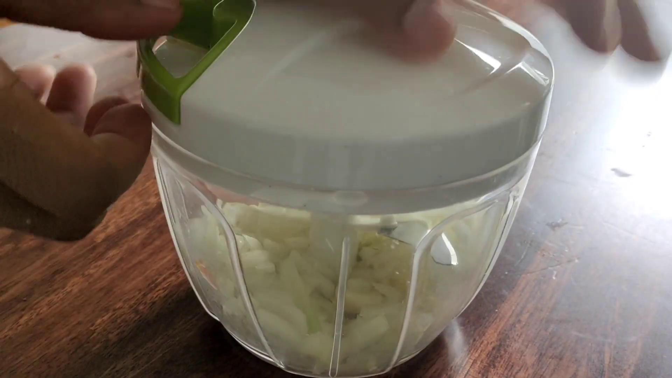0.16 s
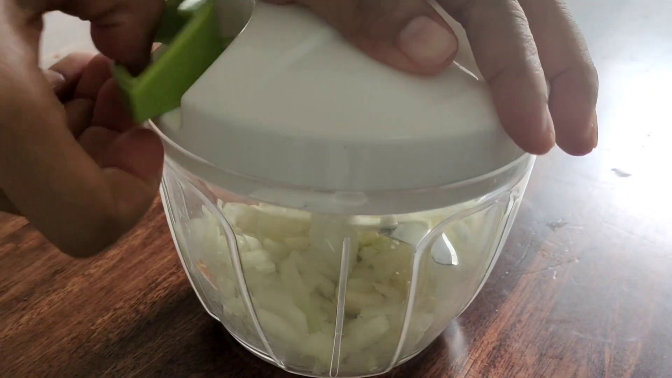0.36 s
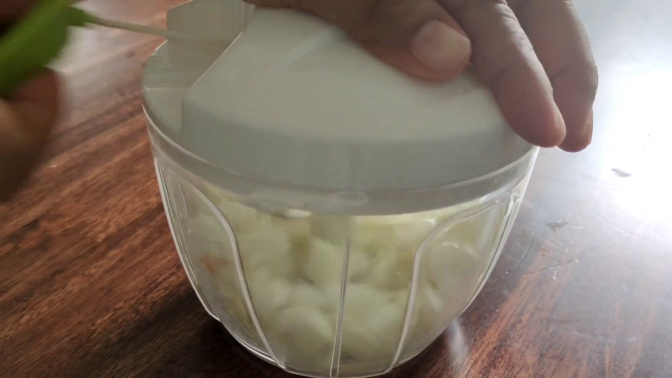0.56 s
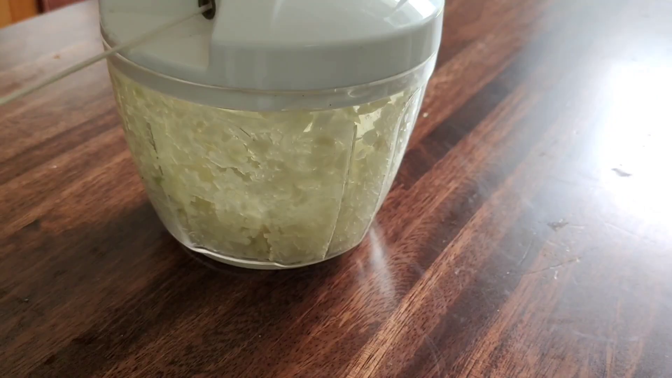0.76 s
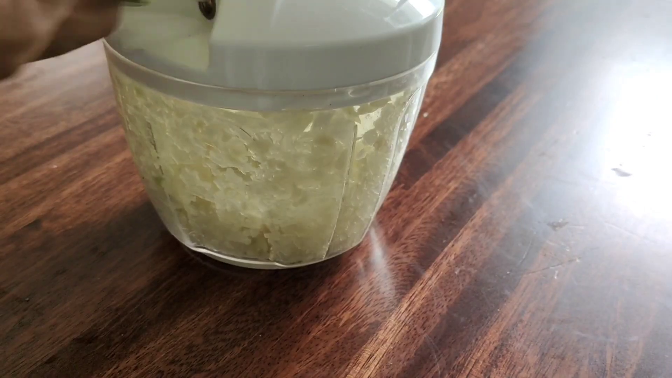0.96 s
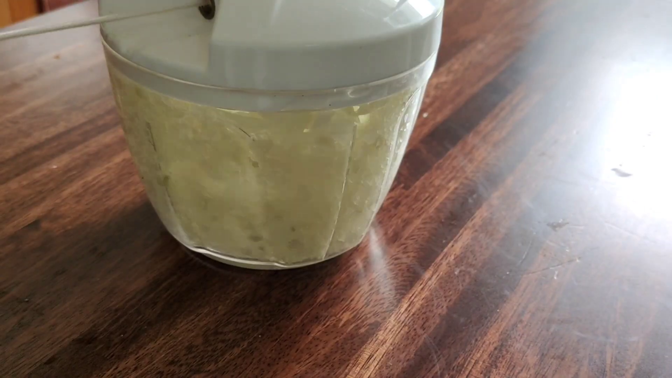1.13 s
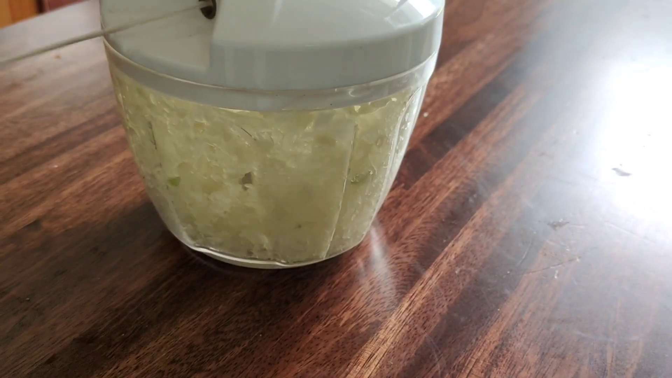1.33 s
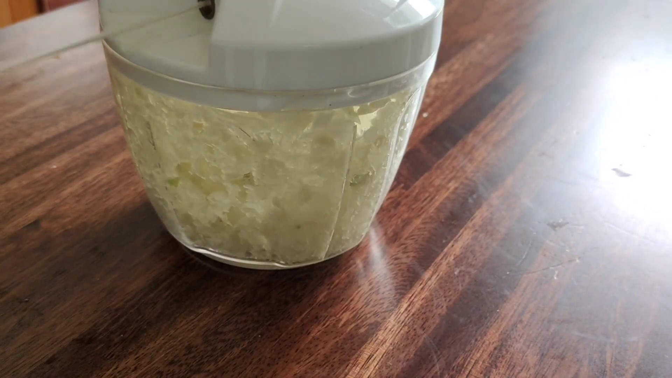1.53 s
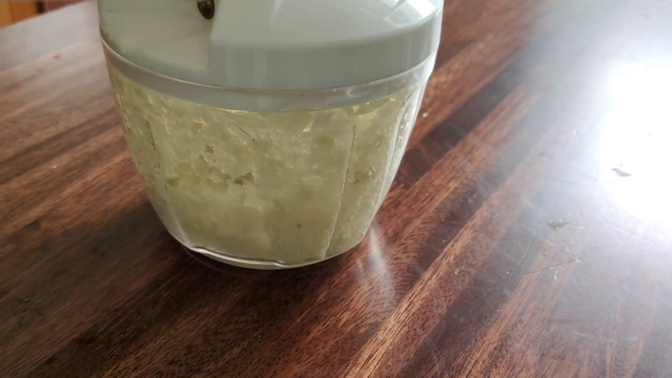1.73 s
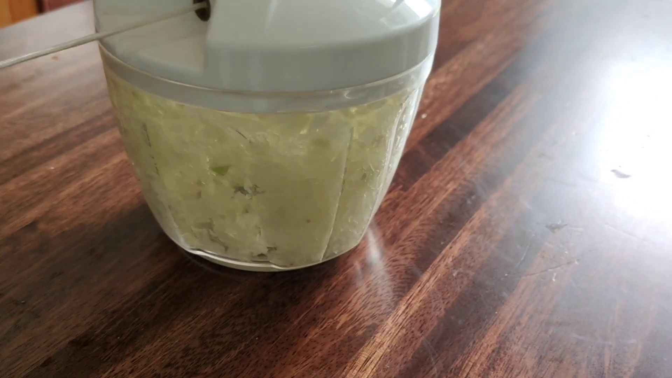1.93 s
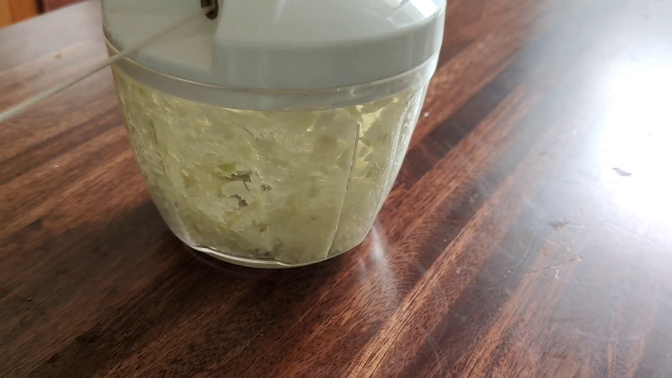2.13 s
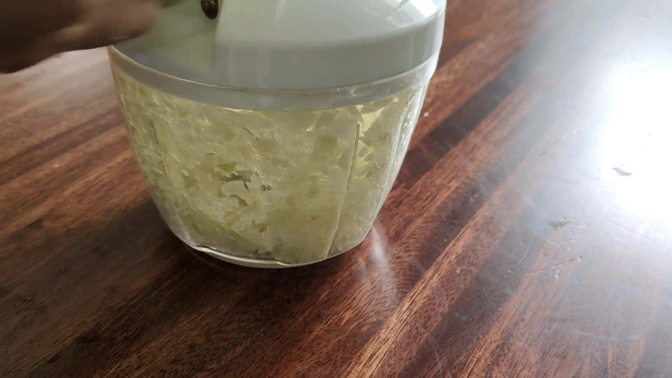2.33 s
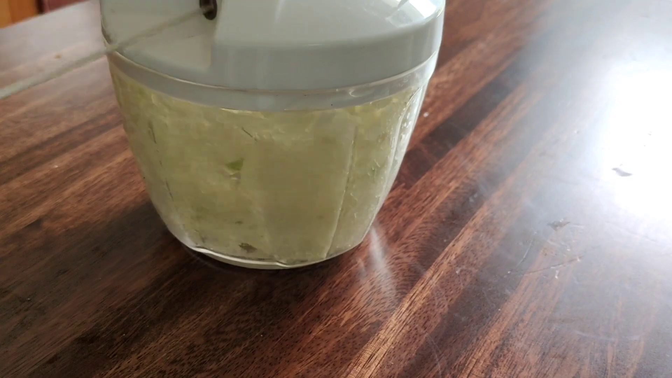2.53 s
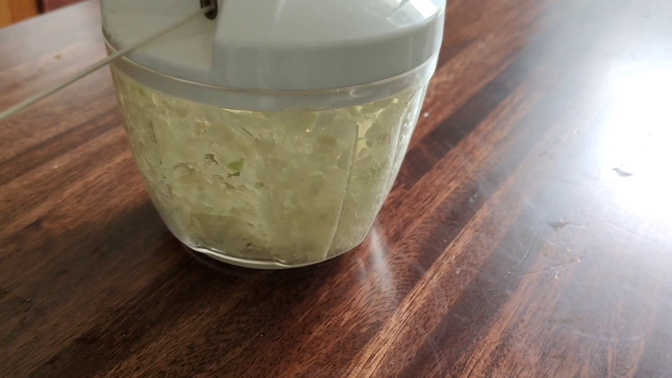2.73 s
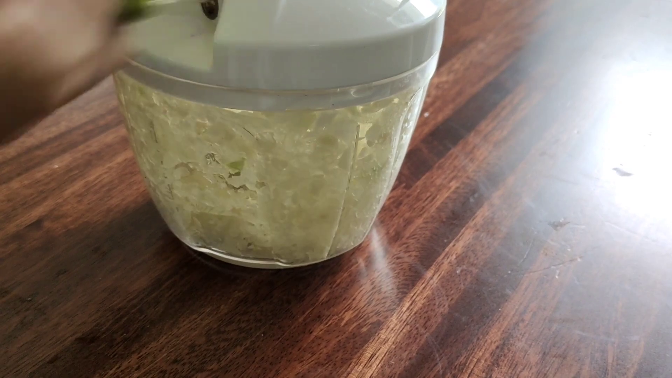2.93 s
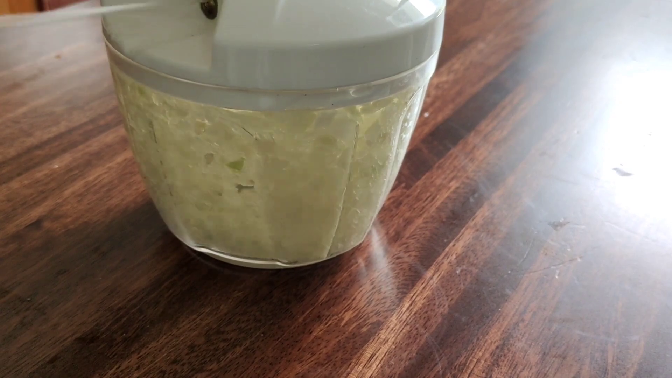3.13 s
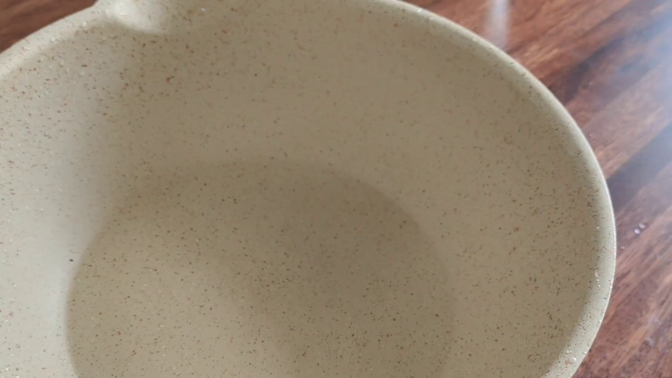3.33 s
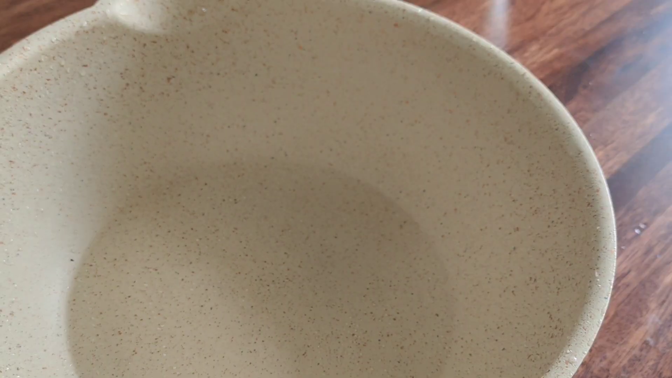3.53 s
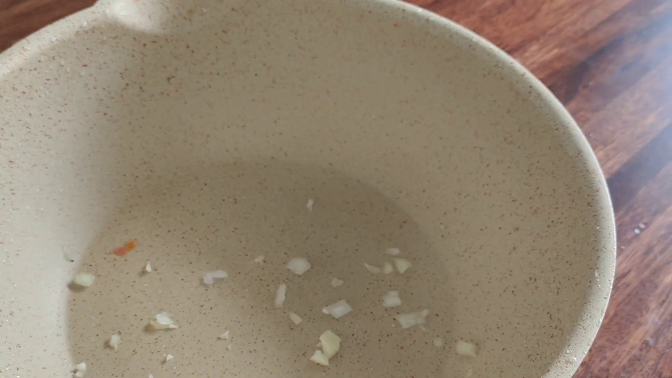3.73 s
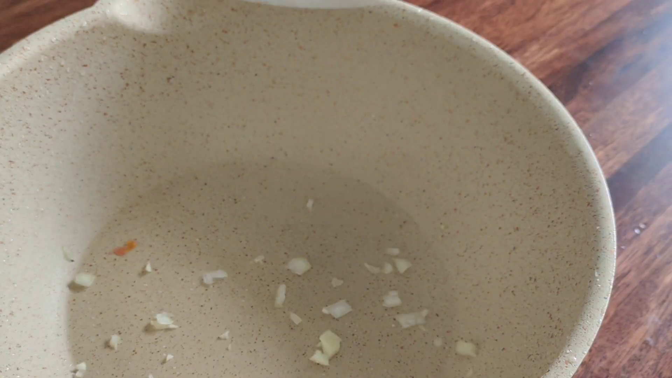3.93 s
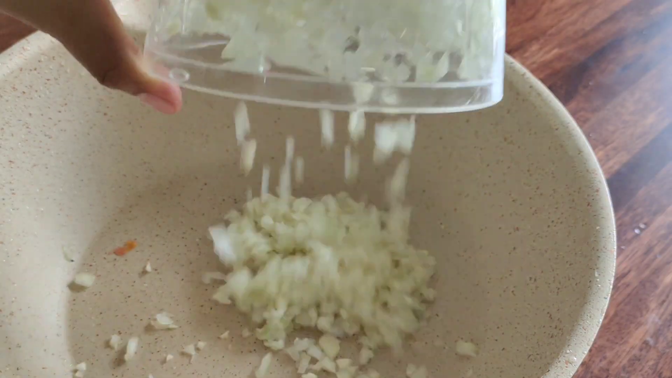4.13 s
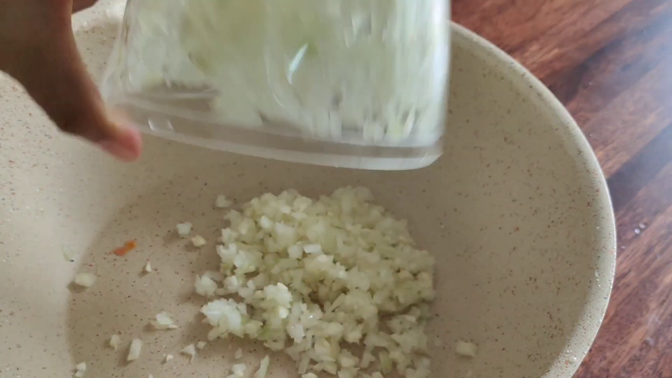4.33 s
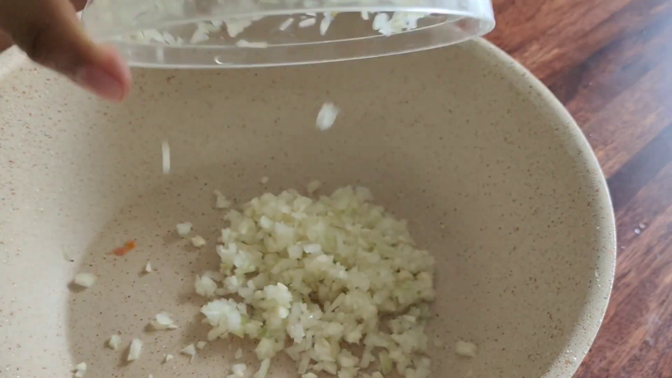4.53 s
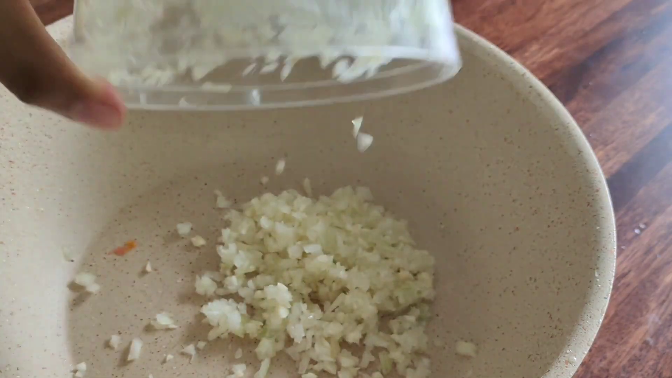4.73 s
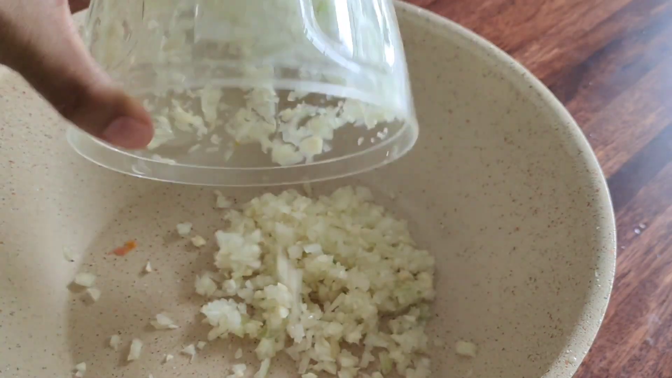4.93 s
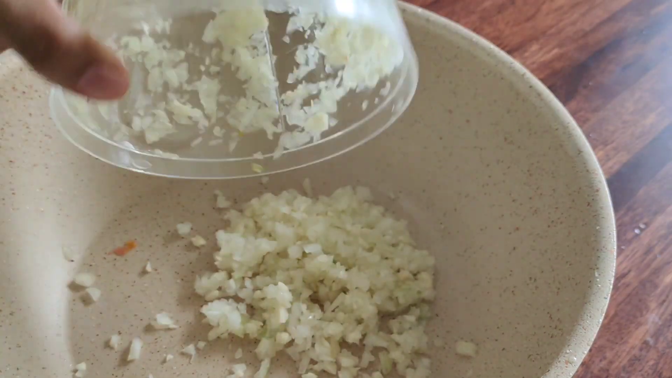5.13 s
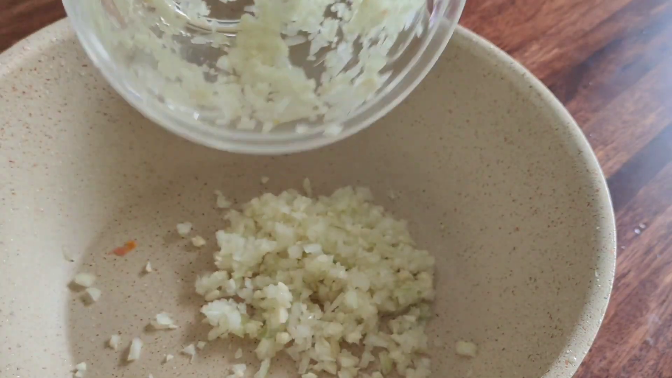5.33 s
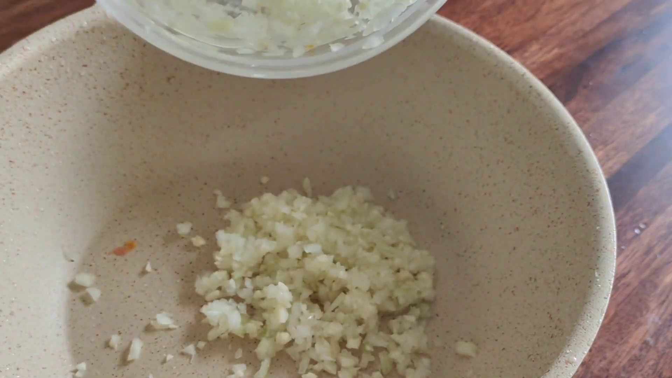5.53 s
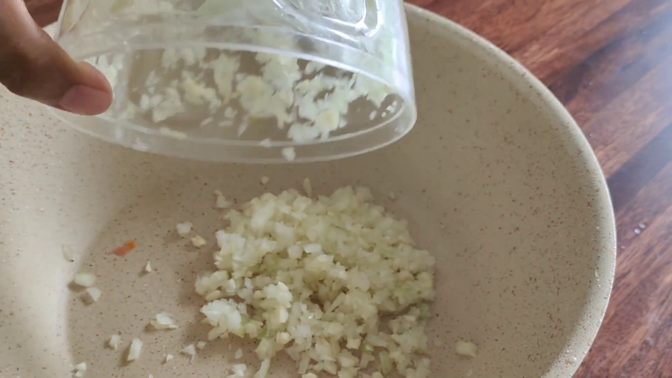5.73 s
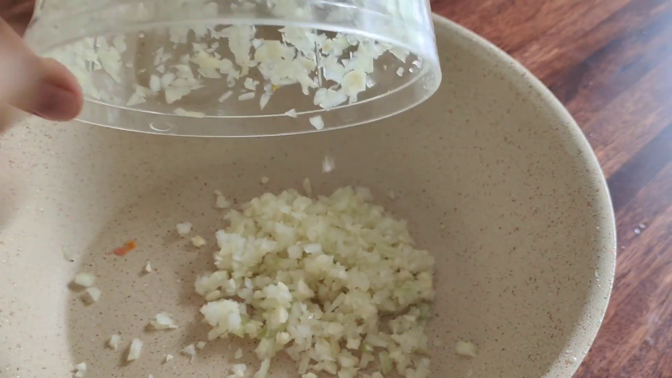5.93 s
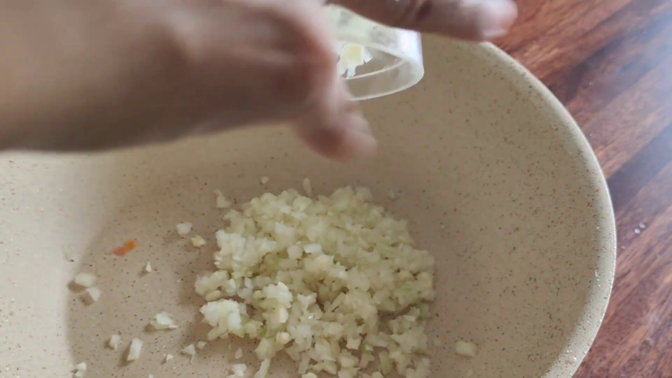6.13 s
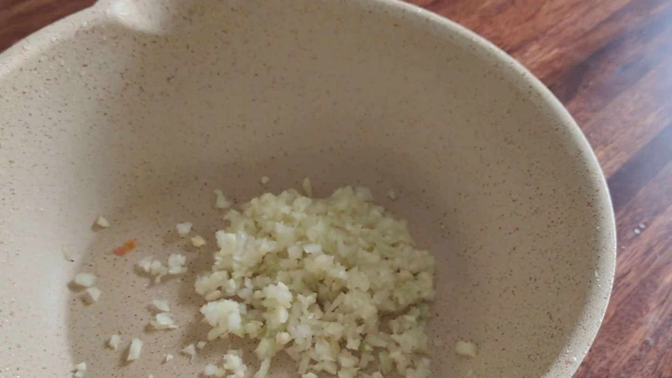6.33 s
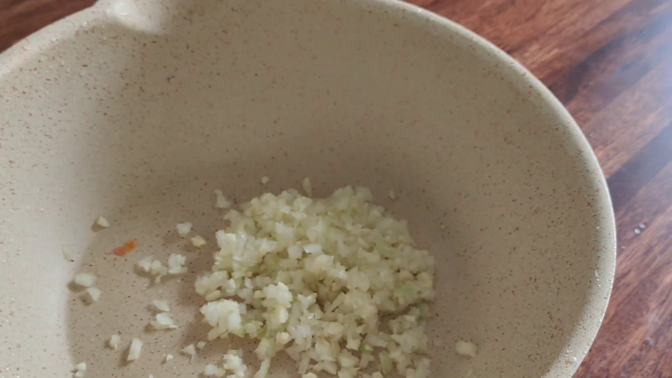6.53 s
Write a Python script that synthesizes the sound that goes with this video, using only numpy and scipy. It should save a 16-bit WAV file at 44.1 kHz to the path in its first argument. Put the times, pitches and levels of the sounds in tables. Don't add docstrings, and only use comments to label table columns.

```python
import sys
import numpy as np
from scipy import signal
from scipy.fft import rfft, irfft, next_fast_len
from scipy.io import wavfile

SR = 44100
rng = np.random.default_rng(int(sys.argv[2]) if len(sys.argv) > 2 else 0)


def int16_out(signal):
    q = np.round(np.clip(np.atleast_2d(signal).T, -1, 1) * 32767)
    wavfile.write(sys.argv[1], SR, q.astype(np.int16))


def how_loud(loudness_db):
    steps = np.asarray(loudness_db, float) / 20
    return 10 ** steps


N = 294588


def rms_one(x):
    return x / np.sqrt(np.mean(x ** 2) + 1e-20)


def at_hz(points, hz, column=1):
    points = np.array(points)
    return np.interp(np.log(hz), np.log(points[:, 0]), points[:, column])


def drift(rate):
    r = np.exp(-80 * np.pi * rate / SR)
    noise = rng.standard_normal(N // 40 + 2002)
    slow = signal.lfilter([1], [1, -2 * r, r * r], noise)[2000:]
    return np.interp(np.arange(N) / 40, np.arange(len(slow)), rms_one(slow))


def resonate(x, hz, width_hz):
    r = np.exp(-np.pi * width_hz / SR)
    poles = [1, -2 * r * np.cos(2 * np.pi * hz / SR), r * r]
    return signal.lfilter(np.array([1, 0, -1]) * (1 - r * r) / 2, poles, x)


def mode_rings(x, modes):
    return [how_loud(db) * resonate(x, hz, width) * (-1) ** k for k, (hz, width, db) in enumerate(modes)]


def band(x, low_hz, high_hz):
    edges = [low_hz, min(high_hz, .45 * SR)]
    return signal.sosfilt(signal.butter(2, edges, "band", fs=SR, output="sos"), x)


def clicks(per_s, spread_db, clump_db, clump_rate):
    sizes = how_loud(spread_db * np.minimum(rng.exponential(1, N), 4)) * rng.choice([-1, 1], N)
    hits = rng.random(N) < per_s / SR
    return how_loud(clump_db * drift(clump_rate)) * sizes * hits + 1e-18


def scatter(spectrum, per_s, burst_ms, alike, spread_db, clump_db):
    contacts = abs(clicks(per_s, spread_db, clump_db, clump_rate=40.0))
    bursts = signal.lfilter([1], [1, -np.exp(-1000 / (burst_ms * SR))], contacts)
    shared, own = rng.standard_normal(N), rng.standard_normal((2, N))
    size = next_fast_len(N)
    colour = how_loud(at_hz(spectrum, np.fft.rfftfreq(size, 1 / SR) + 1))
    return rms_one(irfft(rfft(bursts * (alike * shared + own), size) * colour, size)[:, :N])


def in_time(rows, drives, swell_db=0., rounding=1.):
    t, power = np.arange(0, N / SR, 1 / 1000), 0
    gain_db, share = np.transpose(drives)[:, :, None]
    for start, full, go, stop, db in rows:
        away = np.maximum(np.maximum((full - t) / (full - start), (t - go) / (stop - go)), 0)
        swell = swell_db * np.clip((go - t) / (go - full), 0, 1)
        swing = -20 * away ** rounding - swell
        power = power + how_loud(2 * (db + gain_db + share * swing))
    return power


def per_sample(values):
    return np.interp(np.arange(N) / SR * 1000, np.arange(len(values)), values)


def with_bursts(drive_db, rows, level_db, ms):
    kicks = np.zeros(N) + 1e-18
    for s, peak_db, *_ in rows:
        kicks[round(s * SR)] = how_loud(2 * (peak_db + level_db))
    bursts = signal.lfilter([1], [1, -np.exp(-2000 / (ms * SR))], kicks)
    return 10 * np.log10(how_loud(2 * drive_db) + bursts)


# [Hz, dB per Hz]
ROOM_TONE = [(18, -65), (30, -29.5), (88, -11), (245, -6), (295, -11.5), (355, -10.5), (486, -6.5),
             (540, -17.5), (740, -18.5), (1720, -25.5), (1910, -23), (2060, -31.5), (2290, -26.5),
             (3800, -30.5), (5300, -36), (7500, -35.5), (14400, -39.5), (16000, -43)]
# [Hz, dB rms]
HUM_LINES = [(102.3, -73.5), (199.2, -72.5), (301.5, -65), (398.4, -84), (488, -68.5), (565.2, -80.5),
             (1900, -85), (2239, -86.5), (2385, -93.5)]


def air():
    out, edges = 0, 30 * 2 ** np.arange(0, 9.2, .5)
    white = rng.standard_normal((2, 2, N))
    for k, (low, high) in enumerate(zip(edges, edges[1:])):
        mid, side = band(white[k % 2], low, high)
        hz = np.sqrt(low * high)
        alike = np.clip(at_hz([(100, .87), (600, 0.56), (1400, 0.047)], hz), 0, 1)
        stereo = np.sqrt(1 + alike) * mid + np.sqrt(1 - alike) * side * [[1], [-1]]
        out = out + how_loud(at_hz(ROOM_TONE, hz)) * stereo
    hum = 0
    for hz, db in HUM_LINES:
        level = how_loud(db + 4.5 + 1.5 * drift(6.))
        hum = hum + level * np.sin(2 * np.pi * np.cumsum(hz * (1 + 0.0022 * drift(4.))) / SR)
    return how_loud(-58.5 - 4.0) * rms_one(out) + hum


# [s, s, s, s, dB]
EARLIER_TOUCH = [
    (-0.05, -0.01, 0.0, 0.16, -58),
]
GRIPS = [
    (0.13, 0.2, 0.44, 0.55, -52),
    (0.196, 0.199, 0.202, 0.216, -35.5),
    (0.356, 0.364, 0.372, 0.39, -43),
]
PULLS = [
    (0.515, 0.635, 0.79, 0.84, -23),
    (0.99, 1.115, 1.236, 1.27, -20),
    (1.68, 1.76, 1.87, 1.9738, -18.5),
    (2.345, 2.43, 2.562, 2.635, -19),
    (3.03, 3.19, 3.255, 3.36, -18.5),
]
REWINDS = [
    (0.84, 0.885, 0.895, 0.96, -36),
    (1.29, 1.41, 1.474, 1.65, -25),
    (1.965, 2.085, 2.12, 2.32, -24),
    (2.64, 2.75, 2.819, 2.997, -25),
    (3.33, 3.41, 3.437, 3.465, -32.5),
]
FOOT_SHUDDER = [
    (2.8, 2.93, 3.26, 3.4, -33),
]
LID_AND_TIPPING = [
    (3.62, 3.628, 3.624, 3.68, -36),
    (3.63, 3.65, 3.66, 3.8, -44),
    (3.72, 3.808, 3.822, 3.9, -42),
    (3.8, 3.83, 3.85, 3.95, -52.5),
    (4.06, 4.1, 4.108, 4.19, -43),
    (4.45, 4.56, 4.6, 4.72, -71),
]
FINGER_BRUSH = [
    (5.08, 5.155, 5.165, 5.5, -74),
]
# [dB re its level, share of its swing]
GRIP_DRIVES = [(0.0, 1.01), (-7.5, 1.2), (-5, .4)]
PULL_DRIVES = [(-2.6, 0.99), (-12, 1.16), (-15, .6)]
REWIND_DRIVES = [(0.0, 1.01), (-3.5, 1.3), (-15.5, 0.63)]
SHUDDER_DRIVES = [(-8, 1), (-60, 1), (0, 1)]
TIP_DRIVES = [(1, 1.01), (-11.5, 1.3), (-26, .5)]
BRUSH_DRIVES = [(-4, 1), (0, 1), (-60, 1)]


def motions():
    power = in_time(GRIPS + EARLIER_TOUCH, GRIP_DRIVES)
    power = power + in_time(PULLS, PULL_DRIVES, swell_db=3.0, rounding=1.2)
    power = power + in_time(REWINDS, REWIND_DRIVES, rounding=1.67)
    power = power + in_time(FOOT_SHUDDER, SHUDDER_DRIVES)
    power = power + in_time(LID_AND_TIPPING, TIP_DRIVES)
    power = power + in_time(FINGER_BRUSH, BRUSH_DRIVES)
    return [per_sample(10 * np.log10(p + 1e-14)) for p in power]


# [Hz, dB per Hz]
CUP_COLOUR = [(70, -55), (210, -25), (350, -9), (404, -2), (478, -4), (610, -8), (675, -6.5), (1440, -7),
              (1740, -11), (2190, -10), (3240, -13.5), (5000, -31.5), (6500, -51.5), (11000, -120)]


def grains(contacts, spectrum, low_hz, high_hz, cycles, count):
    pitches, dealt = np.geomspace(low_hz, high_hz, count), rng.integers(0, count, N)
    out = 0
    for k, hz in enumerate(pitches):
        out = out + how_loud(at_hz(spectrum, hz)) * resonate(contacts * (dealt == k), hz, hz / cycles)
    return rms_one(out)


# [Hz, Hz, dB]
CUP_MODES = [(360, 40, -8), (665, 60, 6.5), (950, 180, -0.5), (1434, 37, 0.5), (1893, 70, 1.5),
             (2170, 70, 0.5), (2900, 150, -12), (3500, 150, -17)]
TABLE_MODES = [(131, 24, -9), (160, 22, -2.5), (176.3, 16, -1), (235, 27, -5.5), (293.2, 31, -2),
               (364.4, 52, -6)]


def chopper(rattle_db, shudder_db):
    contacts = clicks(per_s=2500., spread_db=1.0, clump_db=1.5, clump_rate=81.0)
    modes = rms_one(sum(mode_rings(contacts, CUP_MODES)))
    rattle = grains(contacts, CUP_COLOUR, 319.0, 5000., cycles=3.7, count=14) + how_loud(2.5) * modes
    push = clicks(per_s=2000., spread_db=2.0, clump_db=0.5, clump_rate=14.0)
    table = rms_one(sum(mode_rings(push, TABLE_MODES)))
    table = band(band(table, 110., 3000.), 100., 3000.)
    return how_loud(rattle_db - 7.0) * rattle + how_loud(shudder_db + 4.5) * table


def onion_on_wall(rattle_db):
    pelting = scatter(CUP_COLOUR, per_s=1700.0, burst_ms=1.34, alike=0.68, spread_db=3.5, clump_db=1.5)
    return how_loud(rattle_db - 4.0) * pelting


# [Hz, dB per Hz]
RASP_COLOUR = [(2500, -20.5), (4500, 0), (5500, -6), (6080, 0), (6500, -1), (7100, 6.5), (8000, -1.5),
               (9000, 3), (10500, -1), (12000, -8.5), (15300, -4), (16400, -23)]


def cord_and_splatter(rasp_db):
    spectrum = [(500, -68)] + RASP_COLOUR
    spray = scatter(spectrum, per_s=5200.0, burst_ms=0.9, alike=0.7, spread_db=1.0, clump_db=2.5)
    return how_loud(rasp_db - 1.5) * spray


def knocks(rows, contact_ms, q, edge_ms, edge_db, spike, level_db, crack_db, alike,
           high_lift_db=0, third_db=-40, rise_ms=0, placed=False):
    out, t = np.zeros((2, N + 2048)), np.arange(2048) / SR
    soft = signal.butter(2, 4200, fs=SR, output="sos")
    bright = signal.butter(2, [4500., 11500.], "band", fs=SR, output="sos")
    lead = round(rise_ms * SR / 1000)
    alike = np.clip(alike, 0, 1)
    noises = rng.standard_normal((len(rows), 2, 2048))
    for (s, peak_db, low_hz, high_db, fifth), noise in zip(rows, noises):
        noise = np.array([alike * noise[1] + np.sqrt(1 - alike ** 2) * noise[0], noise[1]])
        contact = np.where(np.arange(2048) == lead, spike, noise)
        contact = contact * np.exp(-abs(t * 1000 - rise_ms) / contact_ms)
        contact = signal.sosfilt(soft, signal.lfilter([1], [1, -.7], contact))
        high_hz = fifth if placed else 2060 * np.exp(.08 * noise[1, -1])
        high_db = high_db + high_lift_db
        spray_db = edge_db + (0 if placed else fifth)
        parts = [
            (peak_db + level_db, resonate(contact, low_hz, low_hz / q)),
            (peak_db + level_db + high_db, resonate(contact, high_hz, high_hz / q)),
            (peak_db + level_db + spray_db, signal.sosfilt(bright, noise * np.exp(-t * 1000 / edge_ms))),
            (peak_db + level_db + crack_db, resonate(contact, 3200., 5500.0)),
            (peak_db + level_db + high_db + third_db, resonate(contact, 1.6 * high_hz, 600.))]
        i = round(s * SR)
        out[:, i:i + 2048] += sum(how_loud(db) * part / abs(part).max() for db, part in parts)
    return out[:, :N]


# [s, peak dB, low ring Hz, high ring dB, bright edge dB]
CLACKS = [(0.157, -42, 3000, -2, -15), (0.184, -42, 1300, -10, -20), (0.198, -21, 818, -0.5, -4.5),
          (0.282, -41.5, 684, 17.5, -37), (0.362, -32.5, 538, -4, 2), (0.374, -28.5, 686, 1.5, -32),
          (0.437, -44, 3800, -10, -8), (0.474, -46, 4500, -15, 0), (0.988, -15.5, 875, 3.5, -30),
          (1.038, -30, 1140, 6, 9), (1.662, -21, 471, 1.5, -13), (2.335, -24, 829, -3, 1.5),
          (2.646, -28.5, 945, 6.5, -17), (2.988, -35.5, 738, -14, -18), (3.046, -18, 816, -3, -3.5)]


def clacks():
    return knocks(CLACKS, contact_ms=2.2, q=2.5, edge_ms=3.0, edge_db=3., spike=4, level_db=0,
                  crack_db=-24, third_db=-9, alike=.4)


# [s, peak dB, pitch Hz]
THUMPS = [
    (0.177, -43, 159),
    (4.114, -41, 154),
    (4.519, -42.5, 180),
    (4.559, -45.5, 288),
    (5.97, -42.5, 175),
    (6.014, -46, 282),
    (6.059, -52, 300.3),
    (6.417, -42, 220),
    (6.459, -48, 290),
]


def thumps():
    out, t = np.zeros(N + 8192), np.arange(8192) / SR
    for (s, peak_db, hz), noise in zip(THUMPS, rng.standard_normal((len(THUMPS), 8192))):
        push = noise * t * np.exp(-t / .007)
        rub = noise * t * np.exp(-t / .02)
        thud = rms_one(resonate(push, hz, 41.0))
        thud = thud + how_loud(-6.5) * rms_one(band(band(rub, 120.0, 1000.), 90., 1200.))
        i = round((s - .008) * SR)
        out[i:i + 8192] += how_loud(peak_db + 2.) * thud / abs(thud).max()
    return out[:N]


# [s, peak dB, low ring Hz, high ring dB, high ring Hz]
BLOWS_COARSE = [(0.48, -34, 484, -11, 2130), (0.529, -25, 560, -11, 1970), (0.547, -22, 1400, -11, 2220),
                (0.569, -16, 993, -11, 2100), (0.59, -17, 842, -11, 1940), (0.6, -16, 969, -11, 1950),
                (0.626, -15, 501, -11, 1650), (0.641, -11, 495, -11, 2350), (0.648, -11, 587, -11, 2230),
                (0.657, -12, 926, -11, 1830), (0.675, -16, 1040, -11, 2860), (0.688, -10, 487, -11, 3080),
                (0.725, -6, 1070, -11, 2240), (0.764, -9, 646, -11, 2320), (0.787, -12, 624, -11, 2010),
                (0.881, -23, 813, -11, 1870), (1.038, -16, 1280, -11, 2220), (1.048, -17, 694, -11, 1850),
                (1.081, -12, 659, -11, 2270), (1.116, -11, 794, -11, 2260), (1.128, -13, 923, -11, 2100),
                (1.146, -9, 662, -11, 2190), (1.156, -13, 770, -11, 2360), (1.169, -13, 541, -11, 2160),
                (1.198, -6, 751, -11, 2000), (1.21, -11, 697, -11, 2100), (1.222, -13, 678, -11, 2060),
                (1.246, -12, 842, -11, 1960), (1.258, -20, 767, -11, 1640), (1.429, -14, 659, -11, 1920),
                (1.563, -17, 589, -11, 1660)]
BLOWS_FINE = [(1.707, -21, 724, -15, 2090), (1.736, -17, 888, -15, 2460), (1.75, -9, 816, -15, 2260),
              (1.781, -11, 953, -15, 1640), (1.806, -6, 684, -15, 2170), (1.828, -6, 484, -15, 2160),
              (1.848, -5, 851, -15, 1900), (1.867, -7, 697, -15, 2380), (1.889, -12, 447, -15, 2140),
              (2.014, -18, 657, -15, 1960), (2.051, -15, 657, -15, 1830), (2.403, -15, 659, -15, 1600),
              (2.438, -5, 818, -15, 1910), (2.49, -8, 732, -15, 1910), (2.514, -6, 692, -15, 1610),
              (2.532, -7, 738, -15, 2090), (2.554, -13, 1480, -15, 2200), (2.573, -9, 649, -15, 2000),
              (2.689, -20, 686, -15, 1990), (2.725, -15, 633, -15, 1890), (2.899, -14, 654, -15, 1960),
              (3.143, -14, 401, -15, 2100), (3.162, -12, 425, -15, 1750), (3.192, -10, 748, -15, 2190),
              (3.215, -5, 899, -15, 1610), (3.236, -5, 673, -15, 2800), (3.255, -13, 420, -15, 1950),
              (3.287, -16, 409, -15, 2050)]


def blows():
    coarse = knocks(BLOWS_COARSE, contact_ms=1.2, q=2.8, edge_ms=4.0, edge_db=-27., spike=9., level_db=-2.5,
                    crack_db=-11., high_lift_db=13.0, third_db=-8, rise_ms=1.3, alike=.4, placed=True)
    fine = knocks(BLOWS_FINE, contact_ms=1.2, q=2.2, edge_ms=4.0, edge_db=-26., spike=12., level_db=0.3,
                  crack_db=-6., high_lift_db=15., third_db=-8., rise_ms=1.3, alike=.4, placed=True)
    return coarse + fine


def with_aftershocks(rattle_db):
    return with_bursts(rattle_db, BLOWS_COARSE + BLOWS_FINE, level_db=-13, ms=11)


# [Hz, dB per Hz]
CRUNCH_COLOUR = [(1200, -30), (2100, 1.5), (3400, -2.5), (5000, -16), (8000, -36)]


def crunch(rattle_db):
    cracks = scatter(CRUNCH_COLOUR, per_s=1300.0, burst_ms=1.5, alike=.5, spread_db=3., clump_db=2.0)
    loss_db = 26 * abs(np.arange(N) / SR - PULLS[0][1])
    return how_loud(rattle_db - 2.8 - loss_db) * cracks


# [s, peak dB]
SPLASHES = [(0.5158, -41), (0.5286, -36.5), (0.572, -27), (0.5961, -29), (0.649, -19.5), (0.685, -18),
            (0.7263, -20), (0.862, -30), (0.8889, -30), (0.9872, -33), (1.0077, -38), (1.0381, -24),
            (1.082, -21), (1.1154, -21), (1.1419, -23), (1.1683, -22), (1.1953, -17), (1.2202, -16),
            (1.32, -36), (1.3324, -25), (1.3534, -22), (1.5499, -20), (1.6602, -29), (1.7062, -39),
            (1.7206, -31), (1.7505, -23), (1.7894, -20), (1.8293, -20), (1.8558, -16), (1.976, -36),
            (2.0069, -24), (2.0473, -19), (2.0812, -12.5), (2.3348, -20.5), (2.403, -23.5), (2.4394, -21),
            (2.4614, -21.5), (2.4898, -19.5), (2.5148, -17.5), (2.5537, -20), (2.646, -28), (2.6639, -33),
            (2.6809, -28), (2.7123, -22), (2.7278, -20), (2.8265, -15), (2.9872, -31), (3.046, -19.5),
            (3.1174, -27), (3.1503, -25), (3.2102, -23), (3.2331, -19), (3.276, -24), (3.3553, -35),
            (3.3853, -32), (3.3953, -31)]


def with_splashes(rasp_db):
    return with_bursts(rasp_db, SPLASHES, level_db=-12.5, ms=9.5)


# [s, Hz, dB]
GROAN = [
    (2.84, 267.2, -38),
    (2.92, 271.5, -24),
    (2.968, 292.5, -26),
    (3.01, 271.8, -30),
    (3.104, 270.8, -23),
    (3.148, 293.2, -26),
    (3.206, 286.9, -23),
    (3.232, 268.0, -35),
    (3.26, 282.0, -31),
]
# [s, s, Hz, dB]
SHORT_TONE = (2.939, 3.0, 359, -29.5)


def drag():
    out, t = 0, np.arange(N) / SR
    s, groan_hz, groan_db = np.transpose(GROAN)
    start, stop, hz, db = SHORT_TONE
    groan = np.interp(t, s, groan_hz), np.interp(t, s, groan_db) - 1.5, s[0], s[-1]
    for pitch, level_db, start, stop in (groan, (hz, db, start, stop)):
        level_db = level_db + 300 * np.minimum(np.minimum(t - start, stop - t), 0)
        phase = 2 * np.pi * np.cumsum(pitch * (1 + 0.022 * drift(25.))) / SR
        throb = how_loud(level_db + 5.0 + 3.2 * drift(49.0))
        out = out + throb * (np.sin(phase) + how_loud(-9) * np.sin(2 * phase + 2 * drift(30.)))
    return out


# [s, s, s, s, dB]
RUBS = [
    (3.6, 3.65, 3.66, 3.85, -52),
    (3.7, 3.79, 3.83, 3.89, -54),
    (4.07, 4.1, 4.11, 4.24, -57),
    (4.47, 4.52, 4.53, 4.65, -75),
    (5.05, 5.14, 5.19, 5.35, -72),
    (5.94, 5.975, 5.99, 6.15, -74),
    (6.38, 6.41, 6.46, 6.6, -73),
]
# [Hz, dB per Hz]
RUB_COLOUR = [(700, -20), (1500, -2), (2400, -2), (3900, 0), (5500, -10), (9000, -22)]


def rubs():
    power, = in_time(RUBS, [(0, 1)])
    grit = scatter(RUB_COLOUR, per_s=900., burst_ms=1.5, alike=.5, spread_db=3., clump_db=2.)
    return np.sqrt(per_sample(power)) * grit


# [s, peak dB]
SNAPS = [
    (3.6217, -4),
    (6.1235, -19),
]
# [Hz, Hz, dB]
LID_CATCH = [(440, 230, -7), (1010, 500, 2), (2000, 1500, 2), (3300, 1800, 0), (4750, 2400, -5),
             (6556, 2400, -22), (9200, 1600, -29)]
CUP_WALL = [(929.9, 26, 7), (1180, 209.8, -4), (1933, 80, -6), (2290, 150, 2.5), (3440, 350, 0),
            (2800, 500, -8), (4500, 700, -4), (5600, 900, -8), (7100, 1200, -17), (9300, 1500, -17),
            (11500, 2500, -23)]
SNAP_SPREAD_MS = [0, 2.2]


def snaps():
    out = np.zeros((2, N))
    for (s, peak_db), modes, ms in zip(SNAPS, (LID_CATCH, CUP_WALL), SNAP_SPREAD_MS):
        click = np.zeros(4096) + 1e-18
        click[[0, 9]] = -1, .4
        lags = (rng.random((2, len(modes))) * ms * SR / 1000).astype(int)
        rings = mode_rings(click, modes)
        ports = np.array([sum(np.roll(ring, lag) for ring, lag in zip(rings, row)) for row in lags])
        out[:, round(s * SR):][:, :4096] = how_loud(peak_db) * ports / abs(ports).max()
    return out


# [s, peak dB, low ring Hz, high ring dB, bright edge dB]
TAPS = [(3.649, -41, 790, -17, -9), (3.745, -28, 1010, 2.5, -20), (3.757, -40, 3300, -8, -15),
        (3.789, -30, 3600, -6, -20), (3.805, -27.5, 910, -1, -18), (3.812, -41, 7000, -20, -10),
        (3.819, -37, 7000, -20, -10), (3.826, -35, 2700, -4, -6), (4.06, -42, 1290, -17, -14.5),
        (4.078, -45, 1500, 0, 5), (4.086, -36, 980, 5, -21), (4.1, -42, 918, 11, -26),
        (4.195, -54, 4000, -20, 0), (4.357, -56, 1100, 6, -12), (4.434, -47, 1310, -16, -26),
        (4.468, -47, 3600, -15, -12), (4.514, -55, 786, -5, -15), (4.591, -39, 1180, -15, -26),
        (4.728, -54, 4500, -8, -5), (4.8, -57, 4400, -20, -15), (5.16, -46, 3700, -3, 0),
        (5.278, -54, 931, 2, 0)]


def taps():
    return knocks(TAPS, contact_ms=1.3, q=3.0, edge_ms=1.2, edge_db=-4.0, spike=4, level_db=0,
                  crack_db=-27, alike=.4)


# [Hz, s, dB]
ECHO = [(120, .35, -15), (250, .4, -13), (500, .45, -12), (1000, .5, -12), (2000, .55, -11),
        (4000, .5, -11), (8000, .55, -11), (14000, .3, -11)]


def walls():
    t, tail = np.arange(SR * 3 // 4) / SR, 0
    early = 1 + how_loud(5.) * np.exp(-1000 * t / 25.)
    for hz, t60, db in ECHO:
        shape = how_loud(-60 * t / t60) * (1 - np.exp(-t / .003)) * early
        decay = rng.standard_normal((2, len(t))) * shape / np.sqrt(np.sum(shape ** 2))
        tail = tail + how_loud(db) * band(decay, hz / np.sqrt(2), hz * np.sqrt(2))
    return tail


def room(x, tail):
    return x + signal.fftconvolve(x, tail, axes=1)[:, :x.shape[1]]


CHANGES_S = [
    3.465,
    3.9,
    4.3,
]
LEFT_LAG = [6, 13, 4, 7]
LEFT_DB = [-.3, -3, -1.5, -1.5]
WET_DB = [2.3, -2.5, -1, 6.5]


def scene():
    rattle_db, rasp_db, shudder_db = motions()
    rattle_db = with_aftershocks(rattle_db)
    rasp_db = with_splashes(rasp_db)
    near = chopper(rattle_db, shudder_db) + clacks() + thumps() + blows() + drag() + snaps() + taps()
    part = np.searchsorted(CHANGES_S, np.arange(N) / SR)
    heard = np.maximum(np.arange(N) - np.array(LEFT_LAG)[part], 0)
    left = how_loud(np.array(LEFT_DB)[part]) * near[0, heard]
    direct = np.array([left, near[1]]) + onion_on_wall(rattle_db) + cord_and_splatter(rasp_db)
    direct += crunch(rattle_db) + rubs()
    out, tail = air(), walls()
    edges = [0, *(round(s * SR) for s in CHANGES_S), N]
    fades_s = .018, .03, .04, 1e-6
    for start, end, fade, wet_db in zip(edges, edges[1:], fades_s, WET_DB):
        fade_out = np.clip(np.arange(end - start, 0, -1) / SR / fade, 0, 1)
        out[:, start:end] += fade_out * room(direct[:, start:end], how_loud(wet_db) * tail)
    return out


def band_limit(x):
    return signal.sosfilt(signal.butter(12, 16300, fs=SR, output="sos"), x)


# [Hz, Hz, dB]
LEFT_PORT = [(6950, 1800, -9), (8960, 1730, 8.5)]
RIGHT_PORT = [(7030, 4400, 7), (8320, 2300, -31), (15300, 2000, -2)]
LEFT_SHADOW = 14500, 6000, -20


def record(dry):
    ports = []
    for x, port in zip(dry, ([*LEFT_PORT, LEFT_SHADOW], RIGHT_PORT)):
        for hz, width, db in port:
            x = x + (how_loud(db) - 1) * resonate(x, hz, width)
        ports.append(x)
    x = .85 * np.tanh(np.array(ports) / .85)
    x = signal.sosfilt(signal.butter(2, 90., "high", fs=SR, output="sos"), x)
    hiss = rms_one(band(rng.standard_normal((2, N)), 9000., 16000.))
    rumble = rms_one(band(rng.standard_normal(N), 15., 45.))
    x = x + how_loud(-85.5) * hiss + how_loud(-97) * rumble
    x = signal.sosfilt(signal.ellip(14, .5, 90, 16250, fs=SR, output="sos"), x)
    return band_limit(x)


dry = scene()
out = record(dry)
int16_out(out)
```